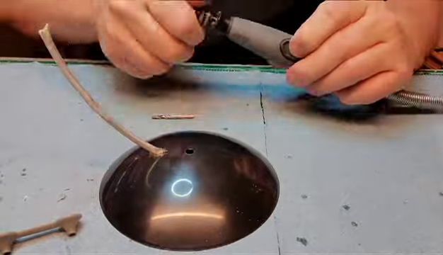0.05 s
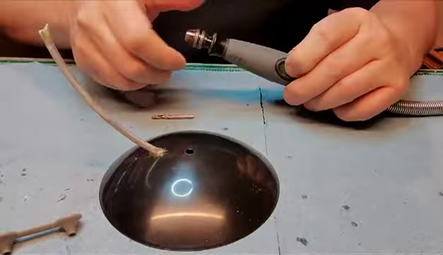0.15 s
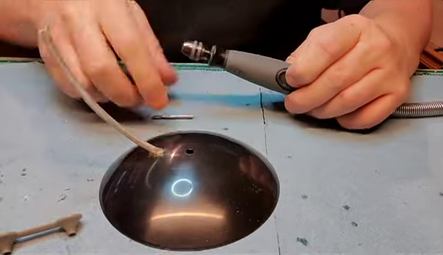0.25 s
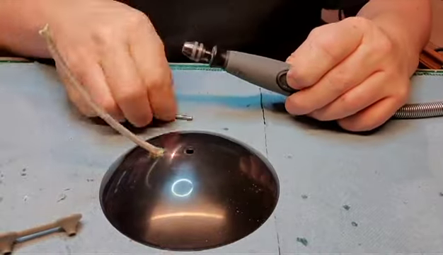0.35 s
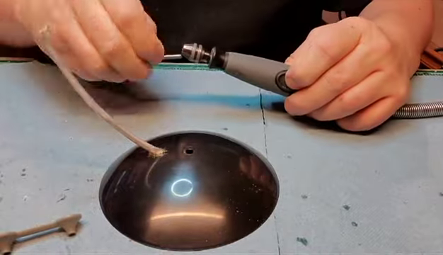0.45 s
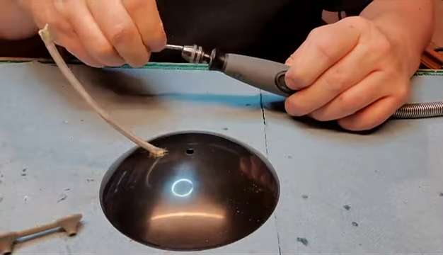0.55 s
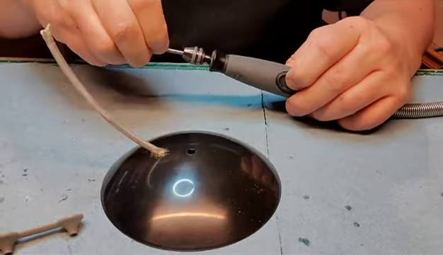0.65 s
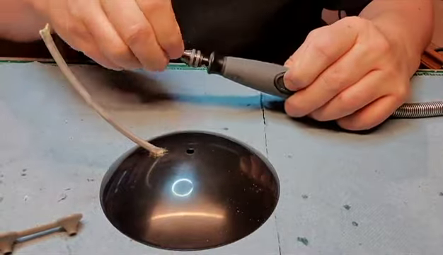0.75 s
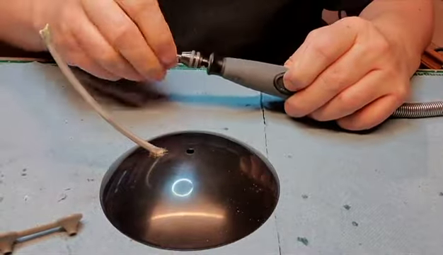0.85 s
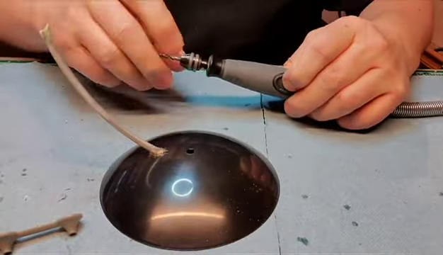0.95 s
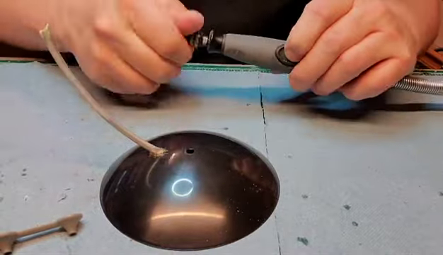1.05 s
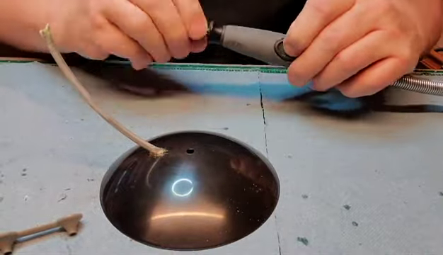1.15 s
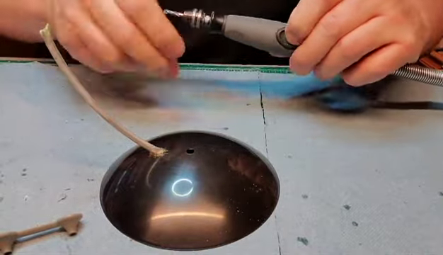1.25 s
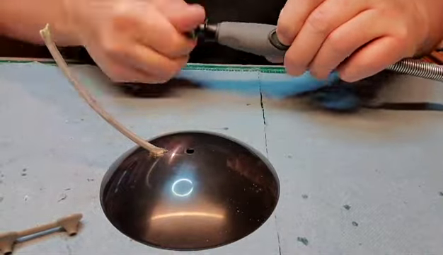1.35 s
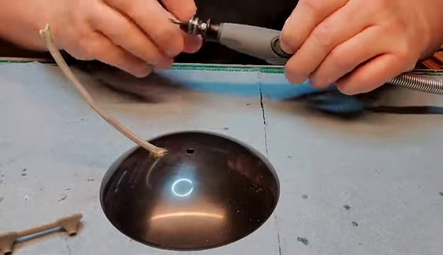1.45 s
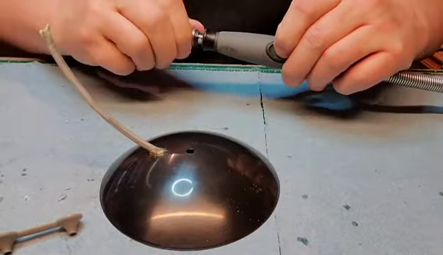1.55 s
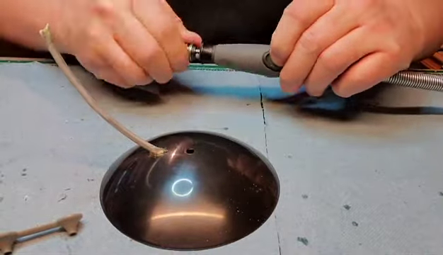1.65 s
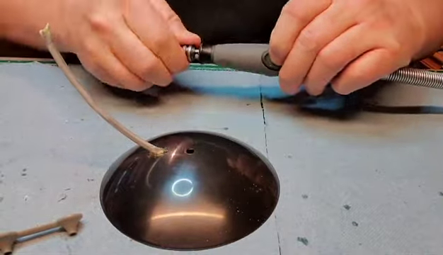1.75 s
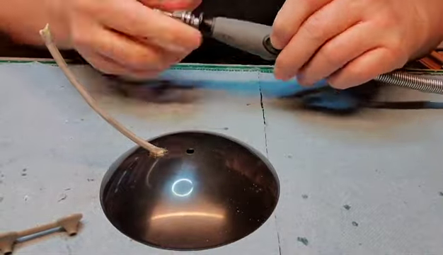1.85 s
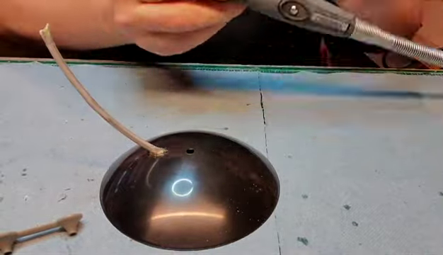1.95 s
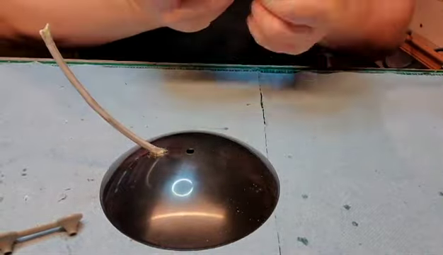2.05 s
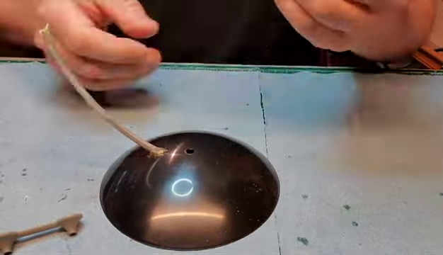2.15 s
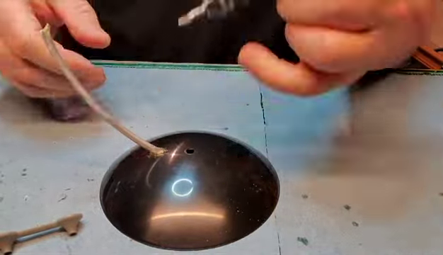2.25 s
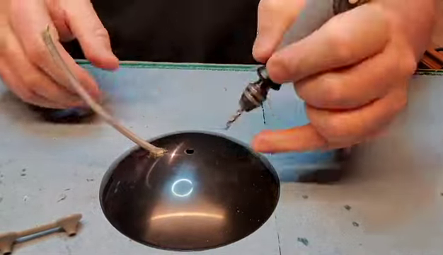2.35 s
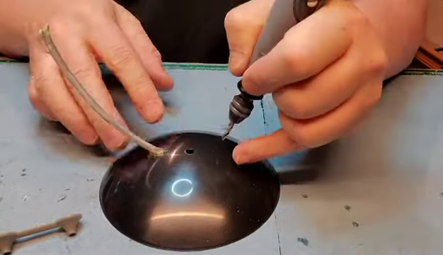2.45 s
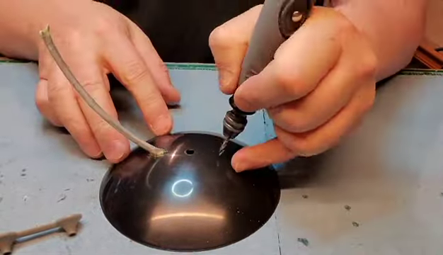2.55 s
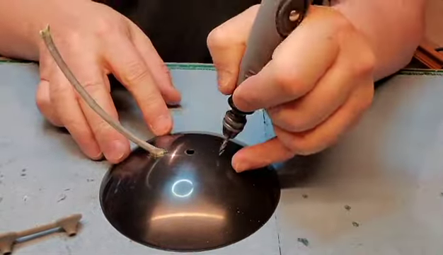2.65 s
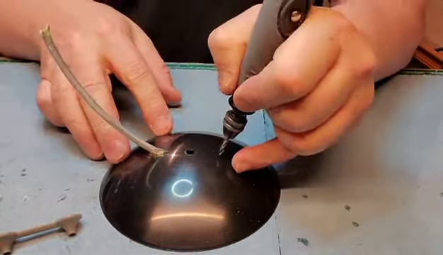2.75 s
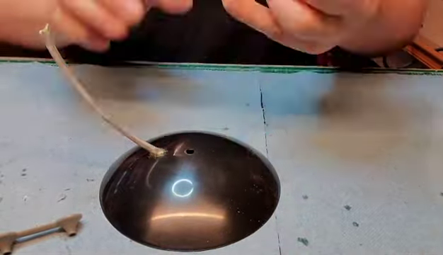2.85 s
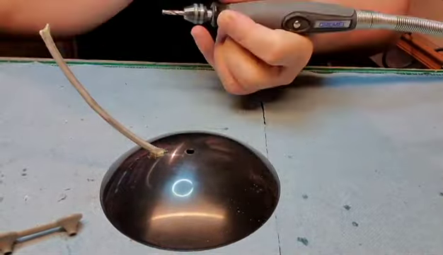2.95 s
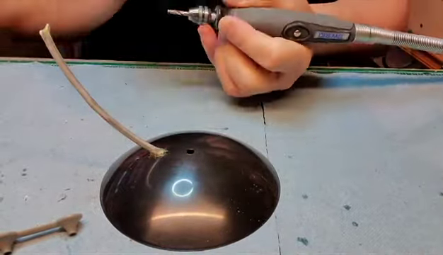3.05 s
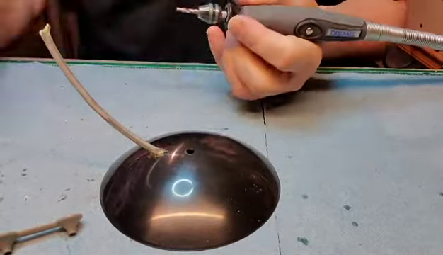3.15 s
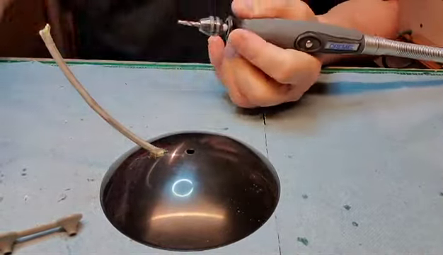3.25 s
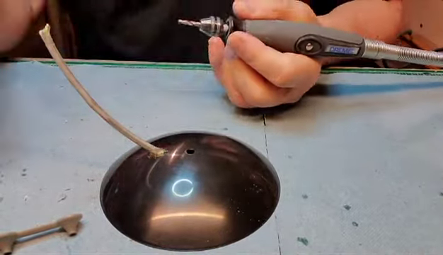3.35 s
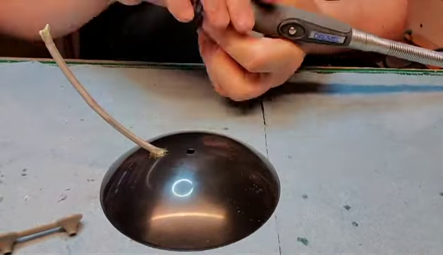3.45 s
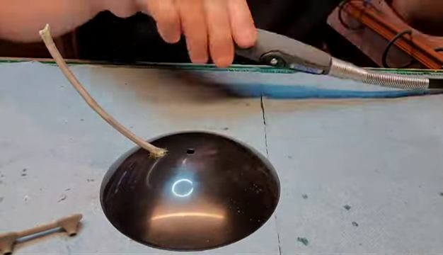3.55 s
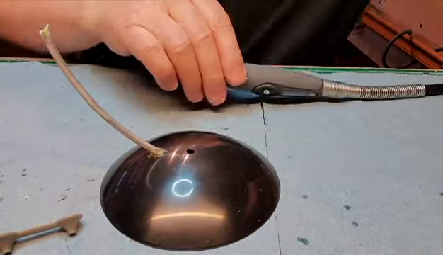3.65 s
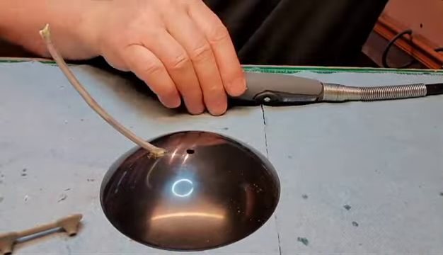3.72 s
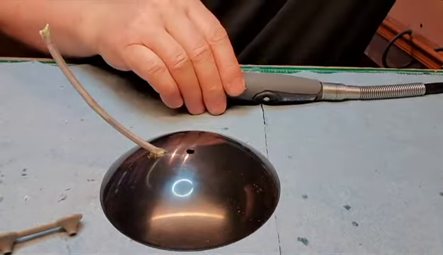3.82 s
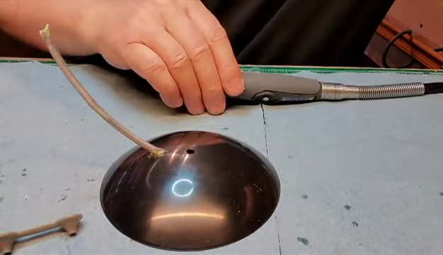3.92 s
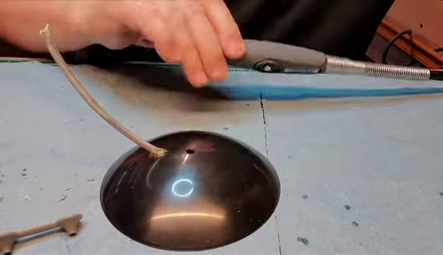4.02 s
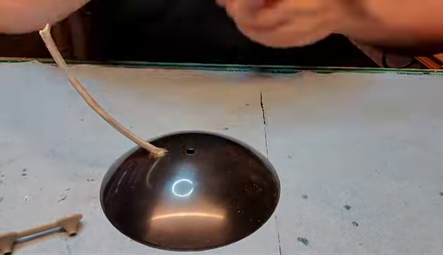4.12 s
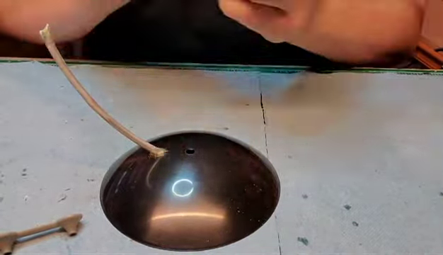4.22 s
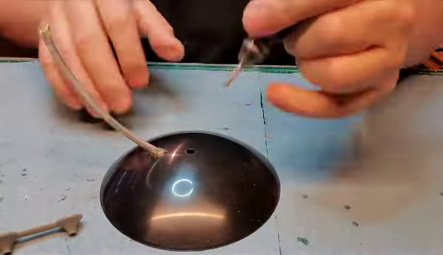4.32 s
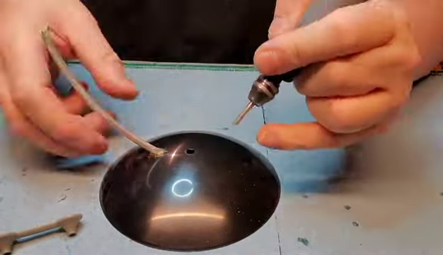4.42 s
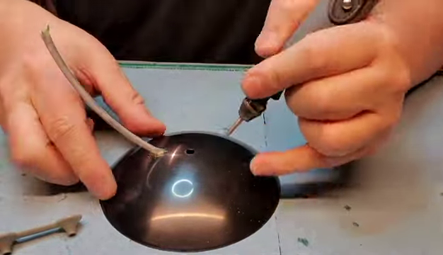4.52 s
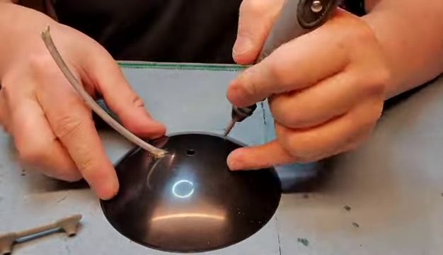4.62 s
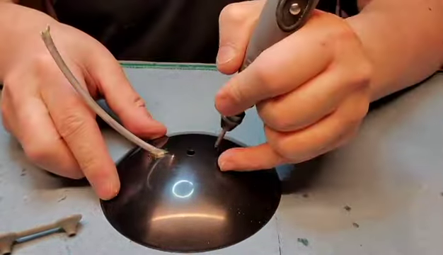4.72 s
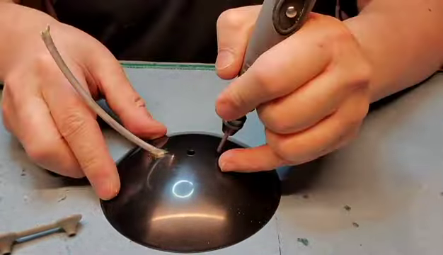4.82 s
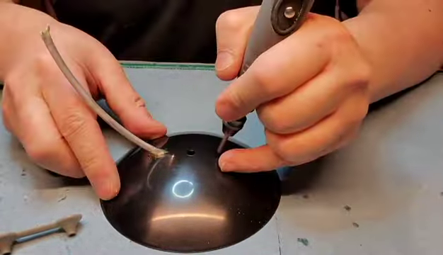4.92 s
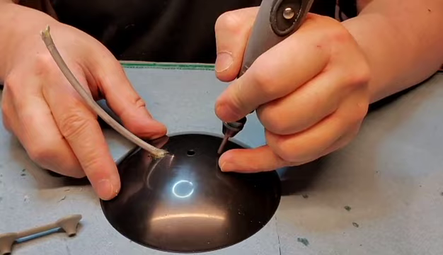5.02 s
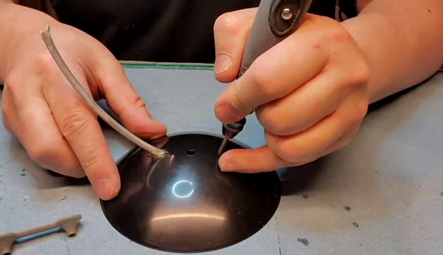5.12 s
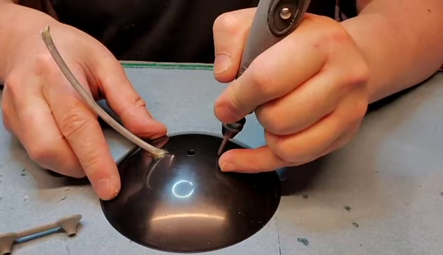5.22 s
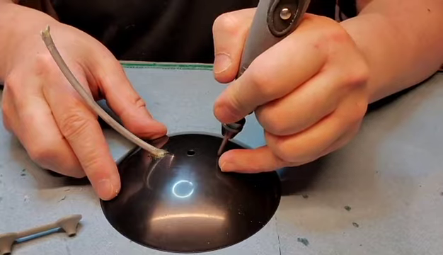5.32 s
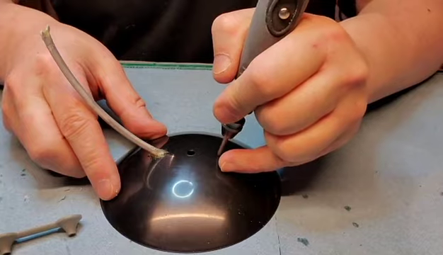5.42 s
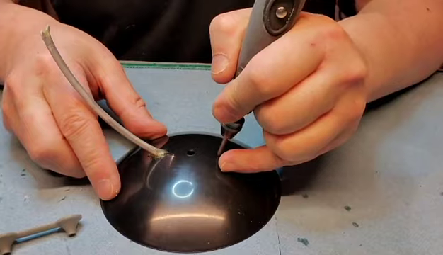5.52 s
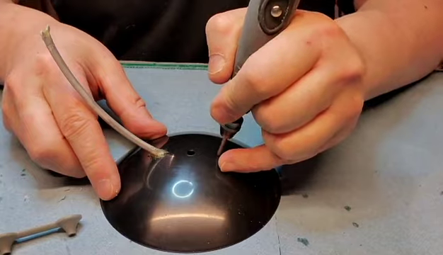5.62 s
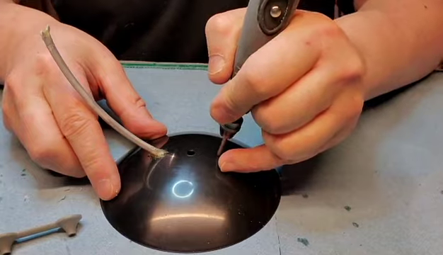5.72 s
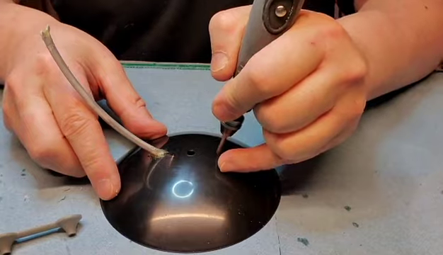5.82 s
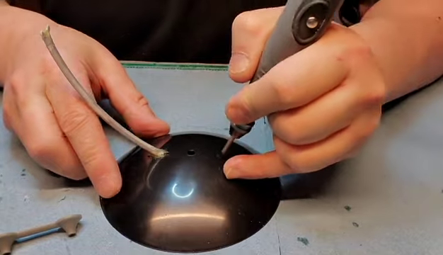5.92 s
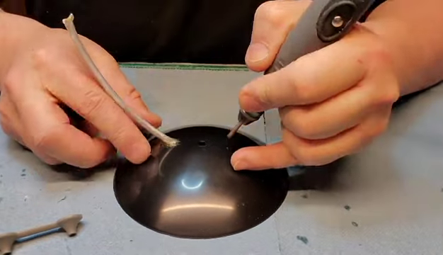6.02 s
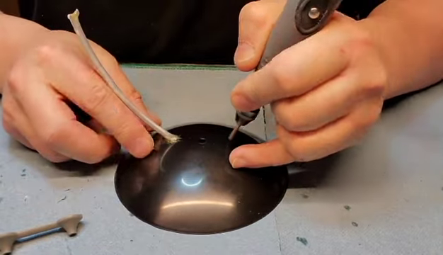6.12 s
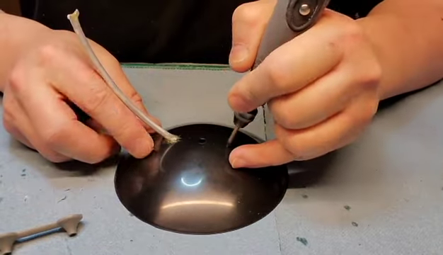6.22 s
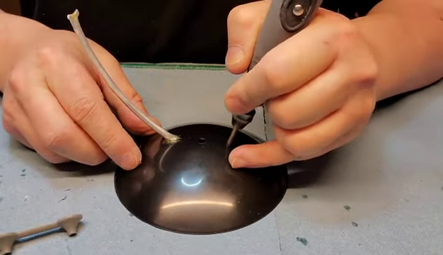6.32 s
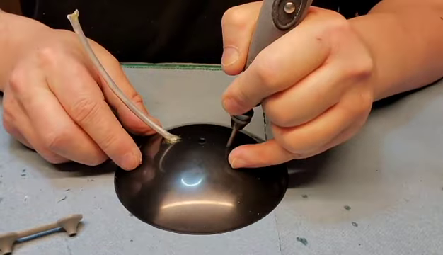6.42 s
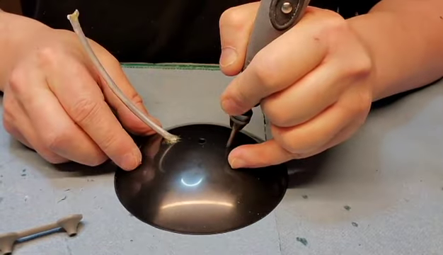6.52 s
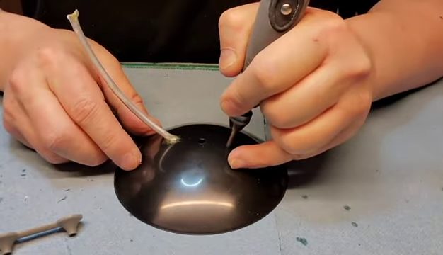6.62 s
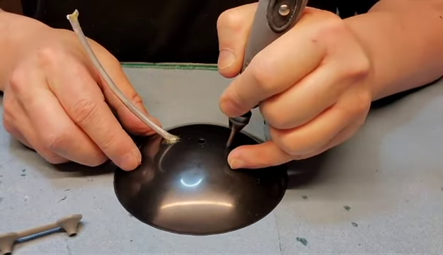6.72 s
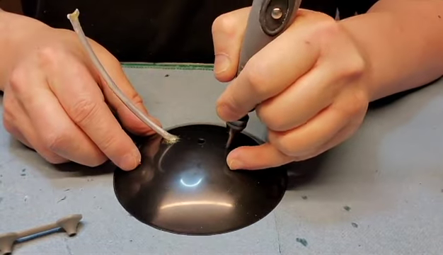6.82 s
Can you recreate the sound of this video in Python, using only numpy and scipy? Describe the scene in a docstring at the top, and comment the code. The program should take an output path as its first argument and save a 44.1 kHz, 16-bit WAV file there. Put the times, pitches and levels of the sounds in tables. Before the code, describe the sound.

Small metallic ticks and soft knocks on a bench, then a rotary tool clicks on, whines up fast and chatters into plastic.

```python
"""Rotary tool at a bench

A rotary tool with a flexible shaft is handled: steel bits tick and the grip knocks on the mat.
Switched on, it winds up as tones locked to shaft speed, with a fan whistle and filtered-noise air;
its bit chatters into a plastic dome as sines and noise resonances at shaft orders, with crackling chips.
Behind it are shaped-noise rumble and whir, a thin hum and a far machine droning, its pitch sliding up."""
import sys
import numpy as np
from scipy import signal
from scipy.fft import rfft, irfft, next_fast_len
from scipy.io import wavfile
from scipy.ndimage import uniform_filter1d

SR = 44100
rng = np.random.default_rng(int(sys.argv[2]) if len(sys.argv) > 2 else 0)


def wrap_up_sound(samples):
    """Save the sound to the file named by the first command line argument, as 16-bit audio."""
    columns = np.atleast_2d(samples).T
    # keep every value between -1 and 1, then stretch to whole-number steps
    tamed = np.clip(columns, -1, 1)
    steps = np.round(tamed * 32767).astype(np.int16)
    wavfile.write(sys.argv[1], SR, steps)


N = 302967

# motor speed and bearing slip in turns per shaft turn: start_s, shaft_hz, slip
SPEED = [(3.86, 300, .058), (3.91, 418, .058), (3.95, 527, .058), (4.0, 650, .058), (4.05, 716, .058),
         (4.11, 760, .058), (4.2, 799, .058), (4.3, 825, .058), (4.55, 857, .06), (4.8, 874, .062),
         (5.2, 890, .065), (5.5, 892.5, .067), (5.8, 879, .068), (6.0, 904.5, .073), (6.15, 916, .077),
         (6.3, 922.5, .077), (6.45, 920, .075), (6.6, 900, .071), (6.74, 864, .068), (6.785, 858, .067),
         (6.805, 836, .065), (6.83, 852, .065), (6.87, 862, .065)]
# left-right likeness of the tool noise: frequency_hz, likeness
TOOL_SAME = [(60, 0.85), (130, 0.82), (290, 0.9), (640, 0.95), (1410, 0.23), (3100, 0.1), (6820, 0.088),
             (9500, 0.99), (12500, 0.7), (15000, 0.7)]
FULL_HZ = 880  # running speed of the shaft
RIPPLE_HZ = 360.5  # supply ripple


def motor():
    """Rotating machinery radiates a line spectrum: phase-locked shaft orders, here with air and housing noise."""
    # brief flares of the treble during the run-up: start_s, length_s, centre_hz, width_hz, level_db
    flares = [(3.945, 0.065, 9990, 251.7, -31.5), (4.135, .04, 8530, 250, -34.5),
              (4.135, 0.043, 7800, 249.4, -39)]
    switch_s, fade_in_s = 3.84, .06
    bog_start_s, bog_db = 6.76, -2  # the motor bogs down in the last bites and its high tones sink
    stumble_turns = 0.71  # scale of the bearing's stumbling while the speed is still low
    t = np.arange(N) / SR
    hz, slip = curves(SPEED)
    load = uniform_filter1d(bites()[0], size=2000)
    # phases in turns
    shaft = np.cumsum(hz) / SR + 0.0043 * drift(44)
    cage = np.cumsum(hz * slip) / SR + 0.011 * drift(25)
    cage = cage + stumble_turns * np.clip(1 - hz / FULL_HZ, 0, 1) * drift(43.0)
    ripple = t * RIPPLE_HZ
    sink_db = bog_db * np.clip((t - bog_start_s) / 0.015, 0, 1)
    shortfall = np.clip(1 - hz / 830, 0, 1)  # upper tones grow as the speed comes up
    tones = shaft_tones(shaft) + bearing_tones(shaft, cage, load, shortfall)
    tones += armature_tones(hz, shaft, ripple, shortfall, sink_db)
    tones += race_tones(hz, shaft, cage, load, shortfall, sink_db)
    tones += fan_whistle(hz, shaft) + hiss(flares)
    near = placed(tones, -9, 0.12) + hammering(shaft) + housing_buzz(hz, load)
    on = np.clip((t - switch_s) / fade_in_s, 0, 1)
    return on * (leftward(near) + cooling_air(shaft)) + housing_judder()


def shaft_tones(shaft):
    """Imbalance excites the first shaft order; the two flutes of the bit excite the second."""
    # shaft whine as the hand turns the grip: time_s, level_db
    whine = [(3.86, -32.5), (3.92, -43.5), (3.96, -35.5), (4.02, -41.5), (4.09, -54.5), (4.5, -57),
             (4.58, -45.5), (5.1, -40), (5.22, -38), (5.83, -42.5), (5.93, -34), (6.08, -31.5),
             (6.25, -38.5), (6.5, -34.5), (6.7, -40.5), (6.76, -33), (6.773, -32.5), (6.777, -24.5),
             (6.785, -24.5), (6.789, -36), (6.798, -35), (6.802, -44), (6.82, -49), (6.845, -44),
             (6.87, -51)]
    free_flute_db = -59.5
    flute = bites()[1]
    first = pulse(shaft, curves(whine)[0] + drift(11.0))
    return first + (flute + amp(free_flute_db)) * tone(2 * shaft, 0, 2.6, 13.5)


def hammering(shaft):
    """A periodic blow is a series of in-phase harmonics: the binding bit hammers the wall once a turn."""
    # time_s, order_2_db, order_3_db, order_4_db
    hammer = [(6.755, -60, -60, -60), (6.765, -37, -34, -44), (6.775, -34, -34, -43),
              (6.784, -36, -38, -43), (6.789, -42, -46, -46), (6.8, -56, -56, -56)]
    return sum(pulse(k * shaft, db) for k, db in zip((2, 3, 4), curves(hammer, -200)))


def bearing_tones(shaft, cage, load, shortfall):
    """Modulation makes side tones: bearing slip shifts each shaft order by whole slip counts."""
    # weaker side tones: shaft_order, slip_count
    sides = [(3, 1), (3, 2), (5, 2), (6, 1)]
    # their levels against weak_db: level_db, cutting_gain_db
    side_levels = [(-12, 14), (-8, 6), (-17, -6), (-10, -5)]
    # the two strongest, by orders 2 and 4: time_s, order_2_db, order_4_db
    pair = [(3.901, -57, -55), (3.97, -62, -66), (4.04, -50.5, -47), (4.16, -47.5, -56), (4.25, -63, -62),
            (4.35, -50.5, -46.5), (4.85, -48, -43.5), (5.1, -48.5, -49.5), (5.17, -46.5, -43),
            (5.6, -39.5, -43), (5.8, -48.5, -52), (5.88, -49, -41.5), (6.1, -45, -43), (6.3, -46.5, -44.5),
            (6.6, -44, -42.5), (6.87, -45, -46)]
    # fifth order, heard while the speed climbs: time_s, level_db
    fifth = [(3.95, -66), (4.03, -55), (4.1, -51), (4.2, -55), (4.5, -59), (4.7, -77)]
    weak_db = -48
    out = np.zeros(N)
    for (k, m), (db, load_db) in zip(sides, side_levels):
        out += tone(k * shaft + m * cage, weak_db + load_db * load + db - 42 * shortfall, 2.2)
    for k, db in zip((2, 4), curves(pair)):
        out += tone(k * shaft + cage, db, 1.2)
    return out + tone(5 * shaft + cage, curves(fifth, -200)[0], 2.0)


def armature_tones(hz, shaft, ripple, shortfall, sink_db):
    """Magnetic forces sound at slot and shaft orders, split by supply ripple and coloured by resonance."""
    # split tones: shaft_order, ripple_count
    orders = [(0, 1), (3, 0), (4, 0), (8, -2), (11, 0), (13, 0), (15, 0), (16, 0), (16, 1), (16, -1),
              (16, 2)]
    # their levels: level_db
    levels = [-50, -54, -57, -54, -55, -49, -55, -50, -52, -55, -57]
    # fourth ripple overtone: time_s, level_db
    fourth = [(3.86, -52), (4.1, -69), (4.3, -51), (4.6, -61.5), (4.7, -65.5), (5.8, -61), (5.88, -58),
              (6.15, -58.5), (6.3, -66), (6.87, -59)]
    # slot order and its ripple neighbours crossing housing resonances: frequency_hz, level_db
    slot_colour = [(5500, -52.5), (6400, -42.5), (6700, -48), (6860, -43), (7000, -38.5), (7190, -47.5),
                   (7330, -54), (7470, -43), (7620, -47), (7800, -53)]
    # second ripple neighbour above the slot order: frequency_hz, level_db
    slot_upper = [(5500, -68), (6300, -41), (7150, -40), (7450, -55), (7700, -57), (8100, -80)]
    slots = 8
    out = tone(4 * ripple, curves(fourth)[0], 1.5)
    for (k, m), db in zip(orders, levels):
        out += tone(k * shaft + m * ripple, db - 36 * shortfall * (k > 0) + sink_db * (k > 4), 2.2, 2.5)
    for m in (-1, 0, 1):
        colour_db = read(slot_colour, slots * hz + m * RIPPLE_HZ)
        out += tone(slots * shaft + m * ripple, colour_db - 14.4 * shortfall + sink_db, 0.91, 1.3)
    upper_db = read(slot_upper, slots * hz + 2 * RIPPLE_HZ)
    return out + tone(slots * shaft + 2 * ripple, upper_db + sink_db, 2.2, 5.0)


def race_tones(hz, shaft, cage, load, shortfall, sink_db):
    """Phase modulation by the slip spreads each high bearing tone into a comb of side tones."""
    # centre of each comb: shaft_order, slip_count
    combs = [(7, 1), (8, 3), (9, 2), (10, 2), (11, 2), (12, 2), (12, 4), (13, 2), (14, 2)]
    # running_level_db, cutting_gain_db, gain_per_40_hz_extra_speed_db
    levels = [(-52, 7, -2), (-52, 0, -6), (-49, -3, 6), (-47, -2, 5), (-47, 1, 1), (-44.5, 1, 2),
              (-47, 0, 1), (-45, -3, 0), (-50, 0, 0)]
    rock_rad, wander_rad = 1.9, .6  # mean depth of the phase rocking and its rms wander
    out = np.zeros(N)
    for (k, m), (db, load_db, speed_db) in zip(combs, levels):
        depth_turns = (rock_rad + wander_rad * drift(3)) / (2 * np.pi)
        rock = depth_turns * np.sin(2 * np.pi * (cage + rng.random()))
        level_db = db + load_db * load + speed_db * np.clip((hz - FULL_HZ) / 40, -1, 1)
        out += tone(k * shaft + m * cage + rock, level_db - 24 * shortfall + sink_db, 2., 4.)
    return out


def fan_whistle(hz, shaft):
    """Blade-passing tone: blade count times shaft speed, weighted by the housing resonances it crosses."""
    # frequency_hz, level_db
    whistle = [(5400, -47), (6800, -35.5), (7600, -30), (8500, -31.5), (10000, -33.5), (11700, -47),
               (13200, -41), (14400, -45), (15200, -49), (15700, -50), (15900, -70)]
    blades = 18
    breath = resonate(rng.standard_normal(N), blades * hz, 800)
    breath = evened(resonate(breath, blades * hz, 800))
    spread = np.clip(5 - hz / 135, .1, .9)  # breathy at low speed, purer as it rises
    breathy = 1.22 * spread * breath * amp(2.1 * spread * drift(170))
    pure = (1 - spread) * tone(blades * shaft, 0, 2.0)
    return amp(read(whistle, blades * hz)) * (breathy + pure)


def cooling_air(shaft):
    """Turbulence is broadband noise, amplitude-modulated once a turn."""
    # spectrum: frequency_hz, density_db
    spectrum = [(2940, -54), (5000, -1.5), (6110, 6.5), (6600, -4), (7370, 4.5), (8270, 9), (8880, 6),
                (10500, 6.5), (11700, 7.5), (12600, 5.5), (15700, 3)]
    # level as the hand turns the vents: time_s, level_db
    level = [(3.88, -40), (3.9, -39), (4.02, -39), (4.04, -37.5), (4.28, -40.5), (4.37, -36.5),
             (4.86, -37.5), (4.87, -36.5), (5.09, -39), (5.12, -38), (5.84, -39.5), (5.88, -36),
             (6.54, -37.5), (6.73, -42.5), (6.86, -34), (6.87, -40)]
    beat = 1 + .35 * np.cos(2 * np.pi * shaft)
    air = amp(curves(level)[0]) * beat * noise(spectrum, TOOL_SAME, 2., (11000, 15500))
    return panned(air, 9000.)


def housing_buzz(hz, load):
    """Structure-borne noise: a shaped spectrum whose level grows with speed and load."""
    # spectrum: frequency_hz, density_db
    spectrum = [(120, -76), (200, -57), (279, -21), (359, 3), (425, -13.5), (500, -13), (575, -3),
                (660, -12), (773, -24), (877, -5), (1120, -20), (1300, -7.5), (1810, -8), (2080, -9.5),
                (2400, -10), (2670, 0), (3050, -5.5), (3340, -1.5), (3690, 1.5), (4400, -5), (4900, -9.5),
                (5600, -10.5), (7280, 0), (12300, -120)]
    full_speed_db, db_per_octave, load_db = -49, 5, 1
    level_db = full_speed_db + db_per_octave * np.log2(hz / FULL_HZ) + load_db * load
    return panned(amp(level_db) * noise(spectrum, TOOL_SAME, 4.2, (3900, 5200)), 3000.)


def housing_judder():
    """Forced resonance: random shakes ring the housing as the motor takes up the flexible shaft."""
    # time_s, level_db
    level = [(3.77, -83), (3.8, -62), (3.84, -58), (3.88, -51), (3.95, -48), (4.02, -51), (4.12, -60),
             (4.3, -60), (4.45, -66), (4.6, -90)]
    # centre_hz, width_hz, level_db
    modes = [(125, 70, 5), (985, 150, -7), (1242, 25, -3), (1440, 90, -2), (1680, 80, -1), (2050, 120, -8),
             (2680, 150, -2), (1300, 900, -4)]
    shakes = rng.standard_normal(N) * amp(4.4 * drift(91))
    body = sum(amp(db) * evened(resonate(shakes, f, w)) for f, w, db in modes)
    return amp(curves(level, -200)[0]) * evened(body)


def cutting():
    """Chatter: uneven flute bites blur the shaft orders, while chips excite the modes of the dome."""
    # higher rough orders against order 2: shaft_order, level_db
    upper_orders = [(4, -8), (5, -10), (7, -12), (10, -13), (11, -13), (12, -11)]
    # resonances of the dome: frequency_hz, width_hz, level_db
    dome = [(302, 40, 16.5), (908, 4.9, 12), (1840, 31, -71), (2514, 74, 26), (2665, 44, 19),
            (3340, 32, -6), (3620, 45, -9), (5300, 57, -20), (5570, 51, -30)]
    # scraping spectrum: frequency_hz, density_db
    scrape_spectrum = [(71, -56), (120, -34), (310, -15.5), (775, -25), (913, -10), (1490, -10.5),
                       (1820, -13), (2000, -11.5), (6000, -13), (7800, -50), (13200, -120)]
    # squeaks as the bit binds in the hole: start_s, length_s, centre_hz, width_hz, level_db
    squeaks = [(6.788, .023, 4060, 60, -32), (6.78, .04, 5200, 700, -39), (6.785, .03, 5900, 400, -40),
               (6.815, .03, 4150, 300, -38), (6.835, .045, 4300, 1800, -35)]
    rough_db, upper_clean_db = -5.5, -14  # rough order 2 against clean; clean order 4 against order 3
    third_rough, fifth_rough = .45, .22  # grinding near orders 3 and 5 against order 3
    hz, slip = curves(SPEED)
    load, flute, third, fifth, scraping = bites()
    turns = np.cumsum(hz) / SR
    grit = rng.standard_normal(N) * amp(1.0 * drift(90))

    def rough(k, width):
        """Narrow-band noise: grit through two resonances that track a shaft order."""
        return evened(resonate(resonate(grit, k * hz, width), k * hz, 3.0 * width))

    upper = sum(amp(db) * rough(k + 0.0048, 140) for k, db in upper_orders)
    chatter = amp(rough_db) * flute * (rough(2.03, 99.0) + upper)
    wobble = 1 + .25 * np.cos(2 * np.pi * np.cumsum(hz * slip) / SR)  # the slipping bearing rocks the bit
    clean = wobble * tone(3 * turns, 0, 1.06)
    chatter += third * (clean + third_rough * rough(2.925, 310))
    fourth_tone = third * tone(4 * turns, upper_clean_db, 3., 20.)
    chatter += wobble * (fourth_tone + fifth * tone(5 * turns, 0, 3., 20.))
    chatter += fifth_rough * third * rough(4.85, 450)
    # sparse impulses of random strength and sign, about 700 a second
    chips = amp(3.6 * np.minimum(rng.exponential(1, N), 3))
    chips = chips * (rng.random(N) < 700 / SR) * rng.choice([-1, 1], N)
    colour = irfft(rfft(chips) * amp(read(scrape_spectrum, np.fft.rfftfreq(N, 1 / SR))), N)
    ring = sum(amp(db) * evened(resonate(chips, f, 1.4 * w)) for f, w, db in dome)
    scrape = scraping * (evened(colour) + .5 * evened(ring))
    return leftward(placed(chatter + scrape + snaps(dome) + hiss(squeaks), -12, 0.12))


def snaps(dome):
    """Impulse response: each catch and release of the bit gives a click and rings the dome's modes."""
    # time_s, peak_db (before the low-pass)
    catches = [(5.1506, -24), (5.8215, -20), (6.3245, -23), (6.339, -20), (6.355, -18), (6.36, -24),
               (6.3725, -23), (6.377, -22), (6.389, -21), (6.396, -21), (6.422, -19), (6.429, -20),
               (6.4355, -16), (6.438, -16), (6.4418, -14), (6.444, -18), (6.4575, -16), (6.4625, -13),
               (6.469, -14), (6.472, -18)]
    click_hz, click_t60_s = 3000, .0012
    t, out = np.arange(1500) / SR, np.zeros(N + 1500)
    # a wide mode dies fast
    ring = sum(amp(db - 27 * w * t) * np.sin(2 * np.pi * f * t) for f, w, db in dome)
    click = np.cos(2 * np.pi * click_hz * t) * amp(-60 * t / click_t60_s)
    burst = .3 * ring / abs(ring).max() + click
    for s, db in catches:
        out[round(s * SR):][:len(t)] += amp(db) * burst / abs(burst).max()
    return signal.sosfilt(signal.butter(2, 5500, fs=SR, output="sos"), out[:N])


def bites():
    """Contact envelopes, 0-1 contact and gains of flute, orders 3 and 5, scraping: rise, slanted hold, release."""
    # start_s, length_s, flute_db, order_3_db, order_5_db, scraping_db, change_over_length_db
    cuts = [(5.149, 0.043, -30.5, -35.5, -43, -62, -10), (5.197, 0.02, -50, -37, -47, -55, 2),
            (5.215, 0.069, -39, -40.5, -46.5, -53, 4.5), (5.294, 0.032, -39, -39, -46, -59, -0.5),
            (5.336, 0.45, -43, -37.5, -51, -73, -1), (6.311, 0.092, -49, -67, -59, -46, 12),
            (6.412, 0.094, -45, -57, -67, -34, -1.5), (6.415, 0.023, -36, -57, -65, -34.5, 3),
            (6.433, 0.014, -24, -50, -64, -31, -1.5), (6.455, 0.017, -25.5, -54, -64, -33, 0),
            (6.498, 0.25, -46, -38.5, -62, -60, 0.5), (6.699, 0.065, -38.5, -34, -58, -46, 0.5),
            (6.756, 0.032, -41.5, -62, -47, -50, 6.5), (6.797, 0.015, -58, -40, -55, -36, 1),
            (6.82, 0.063, -39, -42.5, -53, -47, 8.5)]
    rise_s, release_s = 0.003, 0.008
    t, out = np.arange(N) / SR, np.zeros((5, N))
    for s, length, *levels_db, change_db in cuts:
        span = slice(round(s * SR), round((s + length + release_s) * SR))
        age = t[span] - s
        gate = np.clip(np.minimum(age / rise_s, 1 + (length - age) / release_s), 0, 1)
        slant = amp(change_db * np.clip(age / length, 0, 1))
        gains = np.array([np.ones_like(slant), *np.outer(amp(levels_db), slant)])
        out[:, span] = np.maximum(out[:, span], gate * gains)
    return out


def ticks():
    """Stick-slip and impact: a scrape of resonant noise, then an exponential decay."""
    # steel bits, chuck and switch: start_s, peak_db (before panning), centre_hz, t60_s, scrape_s, left_right_db
    contacts = [(0.052, -42, 10700, 0.13, 0.0094, -9), (0.057, -47, 3820, 0.062, 0.011, -6),
                (0.172, -62, 4300, 0.05, 0.006, -1), (0.173, -60, 12000, .06, .01, 0),
                (0.193, -49.5, 12000, 0.048, 0.0026, -9), (0.298, -56, 3220, 0.17, 0.013, -10),
                (0.444, -63, 6950, 0.066, 0.016, -8), (0.297, -70, 5600, .1, .02, -2),
                (0.477, -58, 10100, 0.04, 0.011, -3), (0.488, -50.5, 10000, .06, .004, -6),
                (.536, -63, 10760, .02, .001, 0), (0.672, -43, 12300, 0.059, .001, -8),
                (.673, -52, 4200, .03, .002, -6), (.73, -60, 4300, .03, .002, -3),
                (0.7, -56, 13680, 0.036, .001, -2), (.729, -53, 9600, 0.032, 0.0012, -6),
                (0.767, -54, 11800, .05, .002, -2), (1.026, -64, 14400, 0.041, 0.0024, 0),
                (1.07, -64, 9010, 0.046, .003, 2), (1.082, -54, 13600, 0.062, 0.0046, -5),
                (1.159, -56, 5450, 0.036, 0.0026, -6), (1.175, -65, 12100, 0.063, .006, 0),
                (1.221, -58, 6980, 0.048, .002, -5), (1.29, -47, 10300, 0.025, 0.0076, -6),
                (1.291, -54, 5470, .03, .008, -4), (1.317, -60, 11130, 0.043, 0.0037, -4),
                (1.795, -64, 6540, 0.027, 0.0017, -2), (1.816, -71, 12470, 0.034, 0.0022, 0),
                (2.024, -68, 7000, 0.054, 0.0043, 0), (2.078, -59, 13100, 0.051, .006, -4),
                (2.115, -61, 5200, .04, .003, 0), (2.164, -66, 13500, 0.032, 0.0029, -1),
                (2.824, -54, 5030, 0.086, 0.0064, -7), (2.871, -40.5, 7670, 0.049, 0.004, -5),
                (3.261, -61, 4400, 0.032, 0.0064, -8), (3.28, -56.5, 3640, 0.14, 0.011, -15),
                (3.334, -59, 8730, 0.029, 0.0021, -10), (3.691, -50, 5665, 0.094, 0.0068, -8),
                (3.7633, -37, 11200, 0.067, 0.0005, 5), (3.767, -42, 9100, 0.17, .005, -11),
                (3.83, -31, 7880, 0.057, 0.0036, -10), (3.839, -24.5, 9390, 0.039, 0.0014, -7),
                (3.85, -27, 7900, 0.14, 0.001, -6)]
    out, t = np.zeros((2, N + 6000)), np.arange(6000) / SR
    treble = signal.butter(2, 3200, "high", fs=SR, output="sos")
    for s, db, hz, t60, length, pan_db in contacts:
        grain = rng.standard_normal((2, len(t)))
        grain[1] = 0.22 * grain[0] + 0.32 * grain[1]
        fade = amp(-60 * np.maximum(t - abs(length), 0) / max(t60, .005))
        fade *= np.minimum(t / (0.25 * abs(length)), 1)
        fade *= 1 + 0.44 * np.exp(-t / 0.00094)  # sharper onset
        wide = signal.sosfilt(treble, grain)
        peak = np.array([resonate(g, hz, 1600) for g in grain])
        burst = fade * (0.041 * wide + evened(peak))
        at = round(s * SR)
        out[:, at:at + len(t)] += panned_gain(db, pan_db) * burst / abs(burst).max()
    return out[:, :N]


def knocks():
    """Modal excitation: dull noise taps with bench modes; heavier landings ring the low modes."""
    # grip and hands on the mat: start_s, body_peak_db, upper_modes_relative_db
    taps = [(1.167, -44.5, -8), (1.708, -55, -10), (2.025, -48, -10), (2.079, -48.5, -2), (2.116, -51, 3),
            (2.27, -53, -14), (2.779, -54, -8), (2.827, -43, -22), (2.872, -31, 6), (3.177, -51, -5),
            (3.456, -43, -30), (3.693, -41, -20), (3.77, -47, -23)]
    # the bench top takes the weight: start_s, peak_db
    landings = [(2.873, -24), (2.905, -34), (3.79, -41)]
    # modes of the bench: frequency_hz, level_db, t60_s
    bench = [(155, -5.5, 0.14), (236, 9.5, 0.071), (397, 11.5, 0.029), (738, -31, 0.032), (860, -11, 0.019),
             (2760, -5, 0.016), (3400, -11, 0.014)]
    t, out = np.arange(8000) / SR, np.zeros(N + 8000)
    rings = np.array([amp(db - 60 * t / t60) * np.sin(2 * np.pi * hz * t) for hz, db, t60 in bench])
    low = np.array([hz < 500 for hz, db, t60 in bench])
    thump = rings[low].sum(0) * np.minimum(t / 0.0049, 1)
    for s, db in landings:
        out[round(s * SR):][:len(t)] += amp(db) * thump / abs(thump).max()
    upper = rings[~low].sum(0) * np.minimum(t / 0.0015, 1) ** 2
    for s, db, upper_db in taps:
        puff = rng.standard_normal(len(t)) * amp(-60 * t / 0.081) * np.minimum(t / 0.0028, 1)
        body = resonate(resonate(puff, 470, 330), 390, 920)
        bright = 0.18 * resonate(puff, 1350, 1600) + 0.73 * upper
        out[round(s * SR):][:len(t)] += amp(db) * (body / abs(body).max() + amp(upper_db) * bright)
    dry_knocks = signal.sosfilt(signal.butter(2, 130, "high", fs=SR, output="sos"), out[:N])
    return placed(dry_knocks, 1.0, 0.083) * amp([[-1.2], [1.2]])


def handling():
    """Sliding friction is band-shaped noise: sleeves and fingers slide, fingers brush the grip and mat."""
    # sliding strokes: middle_s, length_s, level_db
    rustle = [(0.028, 0.18, -74.5), (0.196, 0.11, -67), (1.043, 0.11, -83), (1.17, 0.1, -80),
              (1.315, 0.081, -72), (2.1, 0.27, -91), (2.48, 0.27, -83), (3.29, 0.099, -75),
              (3.497, 0.38, -84), (3.82, 0.096, -69)]
    # their spectrum: frequency_hz, density_db
    rustle_spectrum = [(1760, -41), (3000, -25), (4300, -6), (5830, -1), (7480, -5), (10300, 1),
                       (15700, -3)]
    # brushing strokes: middle_s, length_s, centre_hz, width_hz, level_db
    brushes = [(0.062, 0.097, 1770, 1200, -69), (0.32, 0.19, 2780, 1300, -74.5),
               (0.723, 0.13, 2200, 1500, -76), (0.903, 0.33, 2200, 700, -70.5), (.9, .12, 3900, 900, -81),
               (1.099, .2, 2200, 1500, -72), (1.331, 0.15, 2660, 700, -72), (1.502, 0.29, 2450, 600, -77),
               (1.9, 0.35, 4740, 2000, -83), (2.104, 0.46, 4470, 2500, -79.5),
               (2.49, 0.24, 4007, 2500, -76.5), (2.998, 0.059, 2400, 700, -71)]
    t = np.arange(N) / SR
    strokes = sum(amp(db) * np.cos(np.pi * np.clip((t - s) / length, -.5, .5)) ** 4
                  for s, length, db in rustle)
    sliding = strokes * amp(2. * drift(79.2)) * noise(rustle_spectrum, TOOL_SAME, 2., (7000, 14000))
    brushing = hiss([(s - length / 2, length, *rest) for s, length, *rest in brushes])
    return placed(brushing, 0, .08) + sliding


def far_machine():
    """Frequency modulation: a sine follows a sliding, wandering pitch, its level fluttering."""
    # time_s, pitch_hz, level_db
    track = [(0, 258, -59), (.44, 280.8, -61), (.76, 302, -62), (1.26, 327, -63), (1.56, 361.3, -59),
             (1.8, 351.8, -75), (2.05, 355.8, -68), (2.15, 350.8, -56.5), (2.55, 361, -52),
             (2.9, 380.8, -52), (3.1, 384.7, -58), (3.4, 362.4, -45.5), (3.69, 373.3, -54.5),
             (3.78, 377.2, -62.5), (3.9, 386.2, -45)]
    t, (hz, level_db) = np.arange(N) / SR, curves(track)
    level_db = level_db - 40 * np.clip((t - track[-1][0]) / 0.71, 0, 1)  # final fade
    level_db = level_db + 3. * np.clip(2.3 - t, 0, 1) * drift(30.)  # extra flutter, gone by 2.3 s
    return tone(np.cumsum(hz + 3.4 * drift(12.4)) / SR, level_db, 2.5)


def workshop():
    """Ambient noise: rumble and whir of shaped spectra, with a thin steady hum."""
    # left-right likeness: frequency_hz, likeness
    likeness = [(60, 0.97), (180, 0.96), (550, 0.91), (1650, 0.37), (4970, -0.39), (15000, 1)]
    # rumble spectrum: frequency_hz, density_db
    rumble_spectrum = [(12, -76), (20, -27), (70, -30.5), (175, 2.5), (285, -2.5), (354, 4.5), (416, -12),
                       (517, -11.5), (665, -16), (715, -19.5), (826, -24.5), (1320, -21), (1500, -35),
                       (1950, -70), (3300, -120)]
    # whir spectrum: frequency_hz, density_db
    whir_spectrum = [(530, -48), (900, 3.5), (1160, -49), (1320, 5.5), (1420, -12), (1620, 2), (1870, -5),
                     (2370, 2.5), (2840, 1.5), (3050, -3), (4750, -10), (11500, -26.5), (15700, -34)]
    # whir level: time_s, level_db
    whir_level = [(0, -77), (.55, -76.5), (.9, -76), (1.45, -73.5), (1.7, -78), (2, -74.5), (2.7, -73.5),
                  (3, -78), (3.55, -78), (3.8, -73)]
    hum_hz, hum_db, rumble_db = 721, -76.5, -63.5
    hum = tone(np.arange(N) / SR * hum_hz, hum_db, 0.64)
    rumble = amp(rumble_db + 0.081 * drift(3.2)) * noise(rumble_spectrum, likeness, 0.4, (100, 230))
    whir = noise(whir_spectrum, likeness, 1.4, (1800, 3500))
    return hum + rumble + amp(curves(whir_level)[0] + 0.2 * drift(8.7)) * whir


def amp(db):
    """Decibels are logarithmic: 20 dB is a tenfold gain."""
    return np.exp(np.asarray(db) * (np.log(10) / 20))


def evened(x):
    """Normalisation by mean power: rms 1."""
    return x / np.sqrt(np.mean(x ** 2) + 1e-20)


def read(points, hz):
    """Spectrum value at hz, interpolated on a logarithmic frequency scale."""
    f, value = np.transpose(points)
    return np.interp(np.log(hz + 1), np.log(f + 1), value)


def curves(rows, silent_db=None):
    """Linear interpolation of each table column, sample by sample; silent_db holds outside it."""
    s, *columns = np.transpose(rows)
    return [np.interp(np.arange(N) / SR, s, c, silent_db, silent_db) for c in columns]


def drift(hz):
    """Low-pass filtered noise: a slow random wander of rms 1."""
    lowpass = signal.butter(2, hz, fs=SR / 64, output="sos")
    slow = signal.sosfilt(lowpass, rng.standard_normal(N // 64 + 2))
    return evened(np.interp(np.arange(N) / 64, np.arange(len(slow)), slow))


def tone(turns, db, waver_db, waver_hz=10.6):
    """Amplitude-modulated sine on the given phase: rms db, its level wavering by waver_db rms."""
    return np.sqrt(2) * amp(db + waver_db * drift(waver_hz)) * np.sin(2 * np.pi * (turns + rng.random()))


def pulse(turns, db):
    """Phase coherence: an inverted cosine of rms db with no random phase, so that orders align."""
    return -np.sqrt(2) * amp(db) * np.cos(2 * np.pi * turns)


def resonate(x, hz, width):
    """Heterodyne resonance: shift hz to zero, low-pass, shift back; hz may be a curve."""
    turn = np.exp(2j * np.pi * np.cumsum(hz * np.ones(len(x))) / SR)
    r = np.exp(-np.pi * width / SR)
    return 2 * (turn * signal.lfilter([1 - r], [1, -r], x / turn)).real


def noise(spectrum, same, patchy_db, band_hz):
    """Spectral shaping of two-channel patchy noise with set coherence, rms 1 inside band_hz."""
    frames, hz = N // 256 + 5, np.fft.rfftfreq(1024, 1 / SR)
    a, b, c, d, patches = rng.standard_normal((frames, 513, 5)).T
    patches = uniform_filter1d(uniform_filter1d(patches, size=8, axis=0), size=8, axis=1)
    patches = evened(patches)
    like, left = np.clip(read(same, hz), -1, 1)[:, None], a + 1j * b
    right = like * left + np.sqrt(1 - like ** 2) * (c + 1j * d)
    shape = amp(read(spectrum, hz))
    inside = (hz > band_hz[0]) & (hz < band_hz[1])
    share = np.sqrt(np.sum(shape[inside] ** 2) / np.sum(shape ** 2))
    z = np.array([left, right]) * shape[:, None] * amp(patchy_db * patches)
    x = signal.istft(z, nperseg=1024, noverlap=768)[1][:, :N]
    return evened(x) / share


def hiss(rows):
    """Band-pass filtered noise swells, each under a raised-cosine window."""
    out = np.zeros(N + SR)
    for s, length, hz, width, db in rows:
        count = round(length * SR)
        band = resonate(rng.standard_normal(count), hz, width)
        band = evened(resonate(band, hz, 2 * width))
        out[round(s * SR):][:count] += amp(db) * band * np.hanning(count)
    return out[:N]


def placed(x, wet_db, t60):
    """Convolution with direct sound and sparse bench and wall reflections that differ per side."""
    t = np.arange(SR // 8) / SR
    echoes = rng.standard_normal((2, len(t))) * (rng.random((2, len(t))) < .05)
    tail = echoes * amp(-60 * t / t60) * (t > .001)
    # small surfaces throw back only treble
    tail = signal.sosfilt(signal.butter(2, 2000, "high", fs=SR, output="sos"), tail)
    tail *= amp(wet_db) / np.linalg.norm(tail, axis=1, keepdims=True)
    tail[:, 0] = 1  # direct sound
    return signal.fftconvolve(x[None], tail / np.hypot(1, amp(wet_db)), axes=1)[:, :N]


def panned_gain(db, pan_db):
    """Interaural level difference: pan_db is split evenly between left and right."""
    return amp(db + pan_db * np.array([[.5], [-.5]]))


def panned(x, hz):
    """Level difference between the channels, taken at one frequency of the tool's balance curve."""
    # frequency_hz, left_right_db
    balance = [(60, 0.5), (180, 0.0), (550, 0.5), (1650, 1), (4970, -1.5), (15000, 3)]
    return x * panned_gain(0, read(balance, hz))


def leftward(x):
    """Time and level difference: a source a little to the left reaches the right later and fainter."""
    lag_s, lag_edge_hz, lean_db = 0.00005, 7700, 0.45  # above the edge the lag vanishes
    size = next_fast_len(N)
    hz = np.fft.rfftfreq(size, 1 / SR)
    late = np.exp(-2j * np.pi * hz * lag_s / (1 + (hz / lag_edge_hz) ** 6))
    right = irfft(rfft(x[1], size) * late, size)[:N]
    return np.array([x[0] * amp(lean_db / 2), right * amp(-lean_db / 2)])


def scene():
    """Superposition of all sources; the tool's sounds are high-passed at 150 Hz and carry no deep bass."""
    tool = signal.sosfilt(signal.butter(2, 150, "high", fs=SR, output="sos"), motor() + cutting())
    return tool + ticks() + knocks() + handling() + far_machine() + workshop()


def record(dry):
    """Band limiting: a linear-phase low-pass at 15800 Hz."""
    lowpass = signal.firwin(511, 15800, window=("kaiser", 9), fs=SR)
    return signal.oaconvolve(dry, lowpass[None], "same")


dry = scene()
out = record(dry)
wrap_up_sound(out)
```